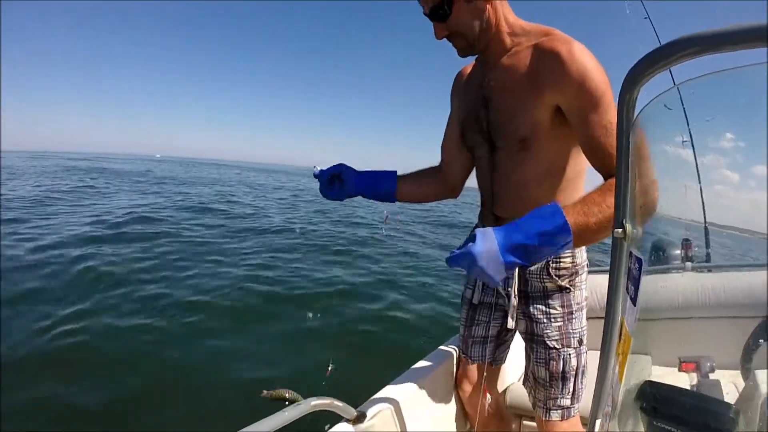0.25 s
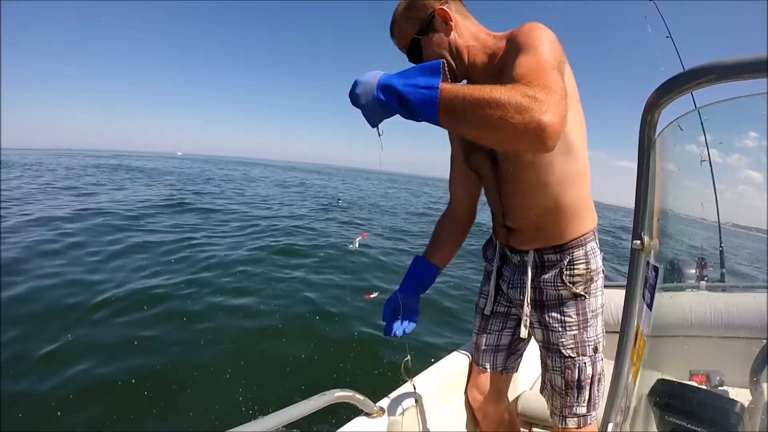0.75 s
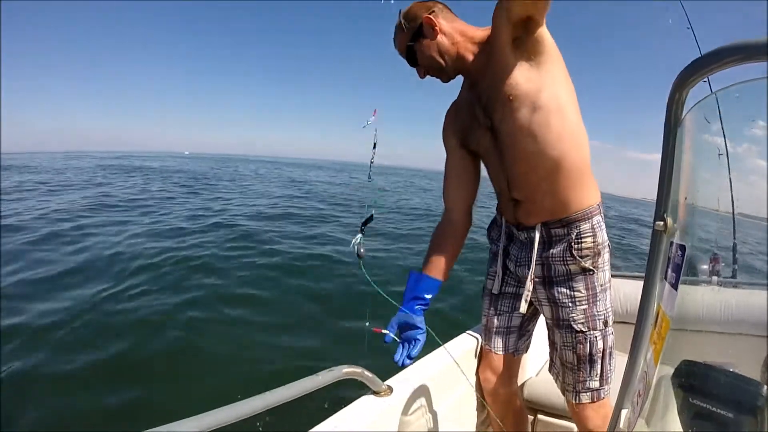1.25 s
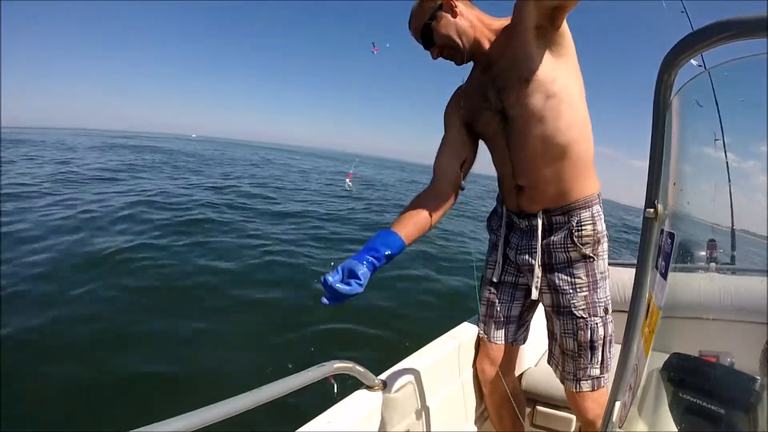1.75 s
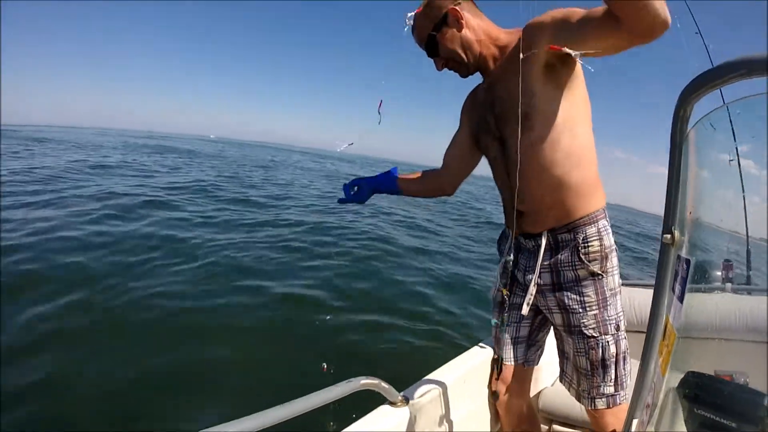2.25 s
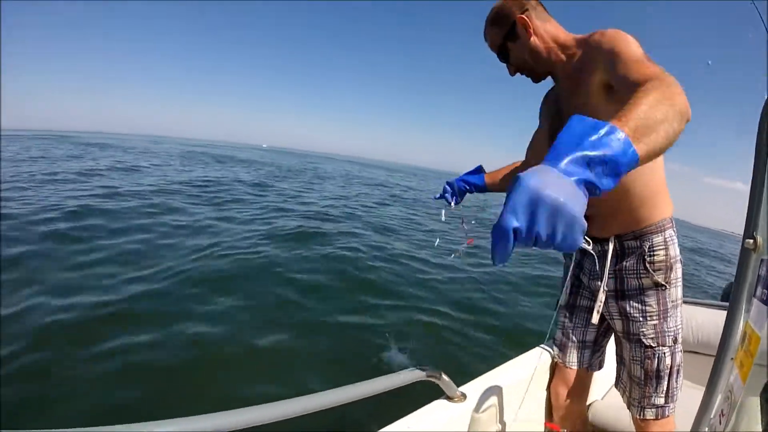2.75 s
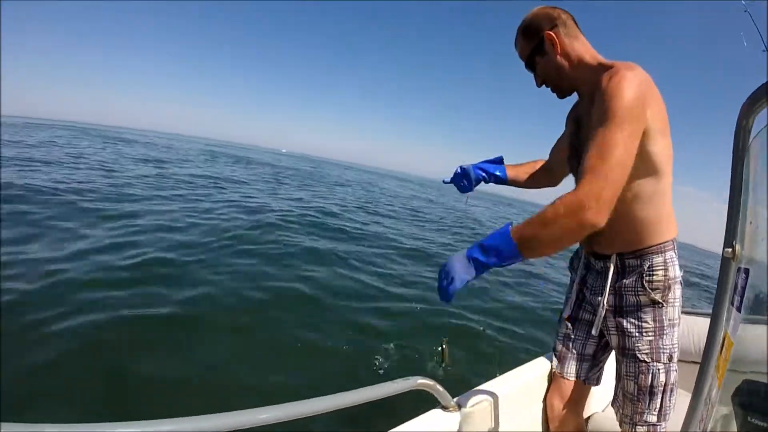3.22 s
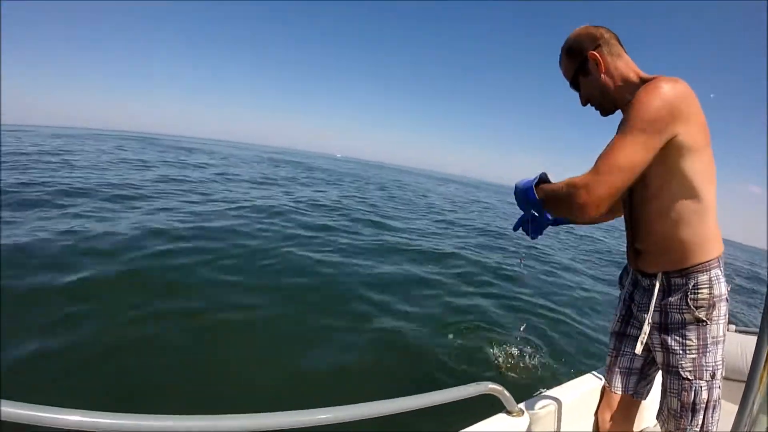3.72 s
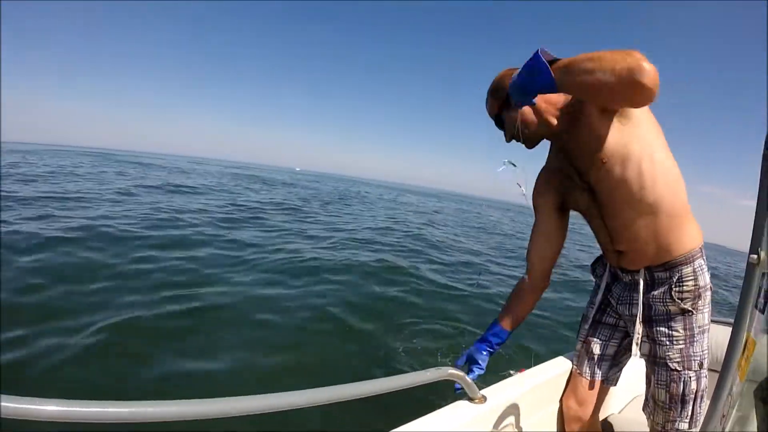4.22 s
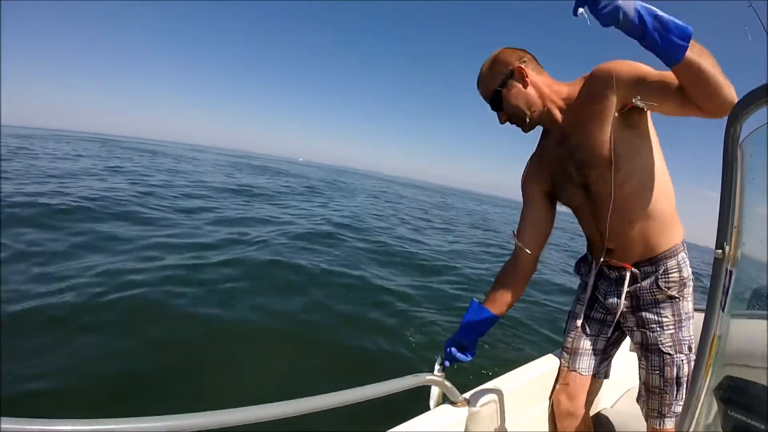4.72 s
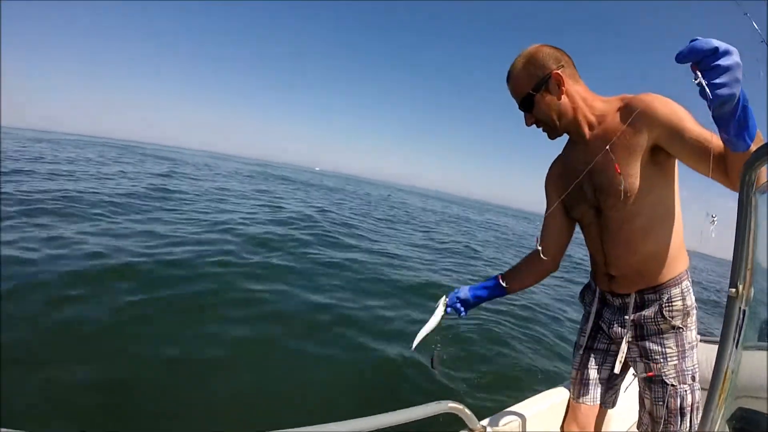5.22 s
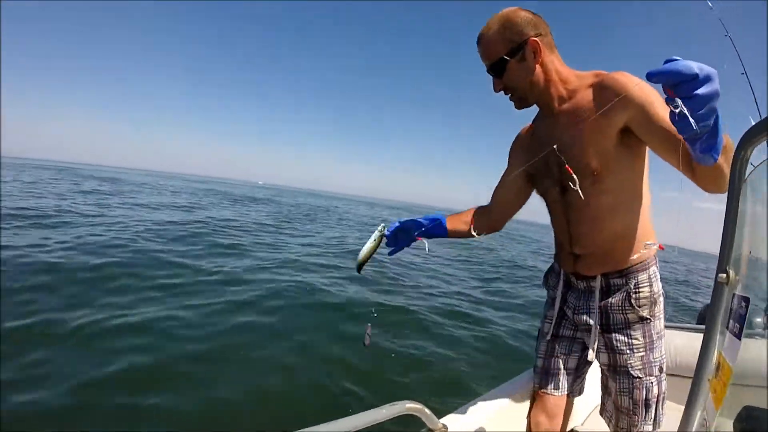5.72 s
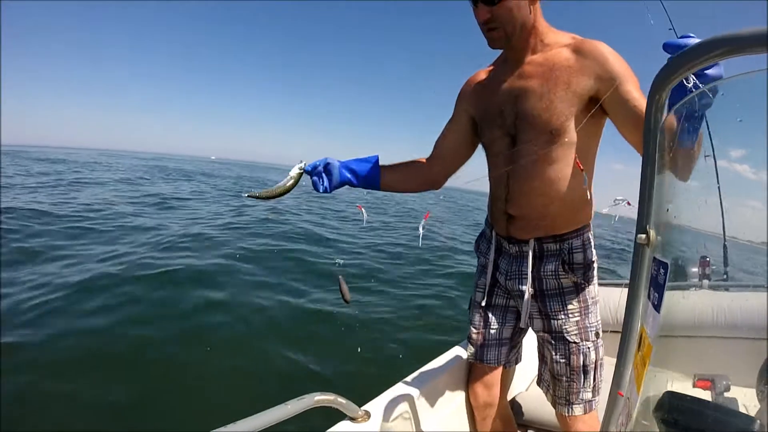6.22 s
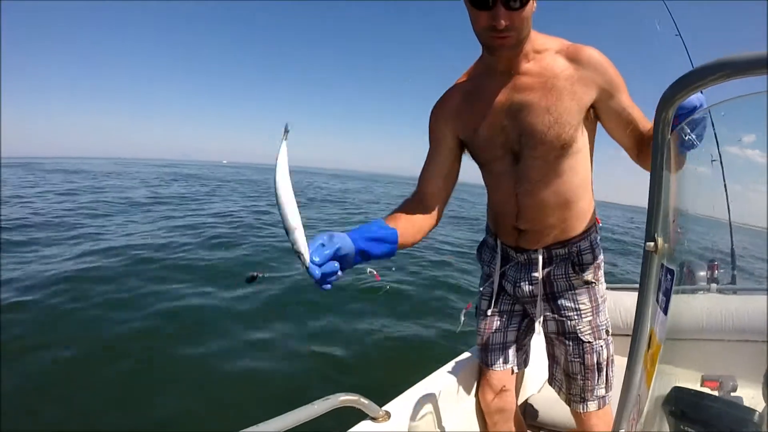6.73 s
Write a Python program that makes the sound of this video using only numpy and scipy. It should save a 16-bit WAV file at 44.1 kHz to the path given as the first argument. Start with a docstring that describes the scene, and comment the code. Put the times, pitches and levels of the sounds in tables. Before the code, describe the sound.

Close onboard microphone, outdoors with almost no echo. Fishing tackle ticks lightly and water dribbles off the catch; a single fibreglass knock rings briefly. A tiny squeak of wet line passes, then a quick run of bright hard knocks and ticks around three seconds. Afterwards it calms to soft sea noise, hull boom, small slaps and barely audible squeaks, until a low thump and loud brittle clicks hit the microphone housing.

```python
"""Tackle knocks on the fibreglass hull of a small drifting boat as a line of hooked fish is hauled in.
Each knock mixes short noise bursts with ringing tones; lighter ticks and dry clicks are built the same way.
Shaped noise and tiny bubble tones make water patter off the catch; gliding tones make wet line squeak in gloves.
A bird calls far off over the noise of light wind, calm sea and hollow hull.
At the end something bumps the microphone's housing and clicks sharply against it."""
import sys
import numpy as np
from scipy import signal
from scipy.fft import rfft, irfft, next_fast_len
from scipy.io import wavfile
from scipy.ndimage import map_coordinates

SR = 44100
rng = np.random.default_rng(int(sys.argv[2]) if len(sys.argv) > 2 else 0)


def output_pcm(signal):
    """Save a mono or channel-first signal as 16-bit PCM at the path in sys.argv[1].

    Samples are clipped to [-1, 1] before scaling.
    """
    pcm = np.clip(np.atleast_2d(signal).T, -1, 1) * 32767
    wavfile.write(sys.argv[1], SR, np.round(pcm).astype(np.int16))


N = 307377  # length of the scene [samples]
T = np.arange(SR // 3) / SR  # time within one event [s]

# colour of a hard crack on the hull: (frequency [Hz], level [dB])
CRACK = [(400, -46), (1000, -5.5), (1350, -5.5), (1650, 6.5), (2000, -0.5), (2400, -4), (2850, 6),
         (3250, -1), (4000, 3.5), (4600, -2), (5150, -19), (5950, 1.5), (7000, -15.5), (8200, -40)]
# colour of the fine treble sizzle of a contact: (frequency [Hz], level [dB])
SIZZLE = [(4120, -2), (7000, -4.5), (8760, -6.5), (10500, -1.5), (12200, -16), (14500, -27), (15500, -32),
          (16000, -48)]
# colour of falling drops and light ticks: (frequency [Hz], level [dB])
DROPS = [(600, -21), (1200, -10), (1600, -4.5), (2000, 1), (2500, -6.5), (3000, -3.5), (3600, 1.5),
         (4500, 1), (5150, -9.5), (5900, 2.5), (6500, -4), (7900, -20.5), (11000, -20.5), (15000, -37.5)]


def amp(db):
    """Turn decibels into a gain."""
    return 10 ** (np.asarray(db) / 20)


def unit(x):
    """Scale to an average strength (rms) of 1."""
    return x / np.sqrt(np.mean(x ** 2) + 1e-20)


def wobble(rate, size=N):
    """Draw a smooth random curve through `rate` random points a second."""
    points = rng.standard_normal(int(size * rate / SR) + 4)
    return map_coordinates(points, [np.arange(size) * rate / SR])


def coloured(x, spectrum):
    """Filter x through (frequency [Hz], level [dB]) points joined on a log frequency axis."""
    m = next_fast_len(len(x) + 8192)
    hz, db = np.transpose(spectrum)
    gain = amp(np.interp(np.log(np.fft.rfftfreq(m, 1 / SR) + 1), np.log(hz + 1), db))
    return irfft(rfft(x, m) * gain, m)[:len(x)]


def noise(spectrum, size=N):
    """Make coloured noise with an rms of 1."""
    return unit(coloured(rng.standard_normal(size), spectrum))


def tilted(spectrum, slope_db):
    """Brighten a colour, as a harder contact does, by slope_db per octave above its lowest point."""
    lowest_hz = spectrum[0][0]
    return [(hz, db + slope_db * np.log2(hz / lowest_hz)) for hz, db in spectrum]


def shifted(table, ratio):
    """Move modes or a colour to another pitch."""
    return [(hz * ratio, *rest) for hz, *rest in table]


def surges(rows):
    """Add up smooth bell-shaped rises of level [dB]."""
    t = np.arange(N) / SR
    return sum(db * np.exp(-((t - s) / half) ** 2) for s, half, db in rows)


def add(track, s, x):
    """Mix x into the track from s seconds on."""
    start = int(round(s * SR))
    part = track[start:start + len(x)]
    part += x[:len(part)]


def burst(spectrum, hold, t60, tail_db=-60, tail_t60=.15):
    """Noise stands for countless close modes: held while the contact chatters, then dying to a weak tail.

    hold, t60 and tail_t60 are in seconds; a t60 is the time to fall by 60 dB.
    """
    body = amp(-60 * np.maximum(T - hold, 0) / t60)
    tail = amp(tail_db - 60 * T / tail_t60)
    shape = (body + tail) * (1 - np.exp(-T / 0.0001))
    x = noise(spectrum, len(T)) * shape
    return x * np.linalg.norm(shape) / np.linalg.norm(x)


def ring(modes):
    """Sum the fading tones of a struck body, each at a slightly new strength every time."""
    out = np.zeros(len(T))
    for hz, db, t60 in modes:
        out += amp(db + rng.standard_normal() - 60 * T / t60) * np.sin(2 * np.pi * hz * T)
    return out


def chatter(x, spread, count=5):
    """Repeat x as a tumbling weight touches several times within `spread` seconds."""
    out = np.zeros(len(x))
    for delay in spread * (np.arange(count) + rng.random(count)) / count:
        add(out, delay, x * rng.choice([-1, 1]))
    return out * np.linalg.norm(x) / np.linalg.norm(out)


def knocks():
    """Each blow cracks on the hull's hard skin and rings the panels; heavy ones also thud in the hull."""
    # tackle striking the hull: (time [s], thud level [dB], panel ring level [dB], crack level [dB],
    # sizzle level [dB], brightness [dB per octave], hull pitch at the struck spot [ratio]);
    # the levels are relative: each part is trimmed further below
    blows = [(0.961, -33.5, -29, -23, -34.5, 2.5, 1.07), (3.1215, -31, -23, -21.5, -34, -6, 1),
             (3.189, -69, -32.5, -27.5, -32.5, 8, 1), (3.225, -32.5, -35, -32, -50, -2.5, 1.5),
             (3.3489, -54, -42, -38, -45.5, 2, 1.3)]
    # colour of the thud, before the pitch ratio: (frequency [Hz], level [dB])
    thud_colour = [(60, -38), (120, 1), (200, -2.5), (370, -0.5), (520, -6.5), (760, -3.5), (950, -22),
                   (1300, -7.5), (2500, -52)]
    # modes of the whole hull, before the pitch ratio: (frequency [Hz], level [dB], 60 dB fade time [s])
    hull_modes = [(150, -8, 0.14), (195, -3.5, 0.15), (295, -30, 0.054), (384, -2.5, 0.07),
                  (677, -16, 0.057), (803, -12, 0.073), (1170, -13, 0.035)]
    # modes of the hull's panels: (frequency [Hz], level [dB], 60 dB fade time [s])
    panel_modes = [(1467, -8.5, 0.055), (1567, -6.5, 0.097), (1670, 0.5, 0.037), (1845, -2, 0.04),
                   (2185, -4, 0.079), (2640, -21, 0.031), (2810, -5, 0.065), (3477, -12.5, .06),
                   (3830, -1, 0.03), (4550, -24, 0.043), (5840, -5, 0.027)]
    out = np.zeros(N)
    for s, thud_db, panel_db, crack_db, sizzle_db, bright_db, spot in blows:
        thud = amp(-2.5) * burst(shifted(thud_colour, spot), hold=0.0093, t60=0.12,
                                 tail_db=-22, tail_t60=0.65)
        thud = thud + amp(-0.5) * chatter(ring(shifted(hull_modes, spot)), spread=0.0122)
        panel = amp(-4.0) * chatter(ring(panel_modes), spread=.009)
        # the first touch is brighter; the body's answer lasts longer
        touch = amp(-3.5) * burst(tilted(CRACK, bright_db + 8), hold=0.001, t60=0.034)
        answer = amp(-6.5) * burst(tilted(CRACK, bright_db), hold=0.0082, t60=0.033,
                                   tail_db=-16.5, tail_t60=0.21)
        sizzle = burst(SIZZLE, hold=0.0018, t60=0.024, tail_db=-23, tail_t60=0.23)
        low = amp(thud_db) * thud + amp(panel_db) * panel
        high = amp(crack_db) * (touch + answer) + amp(sizzle_db) * sizzle
        add(out, s, low + high)
    return out


def ticks():
    """Small things touch too lightly to move the hull: a dry tick and a short ring."""
    # ticks of hooks, swivels and falling drops: (time [s], tick level [dB], sizzle level [dB]);
    # the levels are relative: both parts are trimmed below
    touches = [(0.0456, -45, -73), (0.4448, -43, -73), (0.4636, -38, -70), (0.5404, -30, -65),
               (0.5715, -38, -64), (0.7233, -41.5, -70), (0.866, -42.5, -72), (2.195, -39, -79),
               (2.202, -40, -78), (2.4562, -41, -69), (2.794, -44.5, -69), (3.0502, -36, -70),
               (3.2103, -31, -45), (3.3, -44, -50), (3.362, -30.5, -57), (3.6214, -31.5, -56),
               (3.7225, -44.5, -54.5), (3.774, -36, -75), (3.8234, -44.5, -60)]
    # modes of small steel tackle: (frequency [Hz], level [dB], 60 dB fade time [s])
    tackle_modes = [(1960, -10, 0.027), (3000, 3, 0.03), (3570, -1.5, 0.021), (4640, -6, 0.021),
                    (5740, -9, 0.03), (6550, -5, 0.024)]
    out = np.zeros(N)
    for s, db, sizzle_db in touches:
        tick = burst(DROPS, hold=0.00092, t60=0.026)
        tick = tick + amp(-8.5) * chatter(ring(tackle_modes), spread=0.0033, count=3)
        sizzle = burst(SIZZLE, hold=0.0015, t60=0.079)
        add(out, s, amp(db - 8.0) * tick + amp(sizzle_db - 1.5) * sizzle)
    return out


def close_clicks():
    """Contacts close to the microphone: a short dry ring whose pitch depends on the spot that is hit."""
    # sharp contacts: (time [s], relative level [dB], ring frequency [Hz], 60 dB fade time [s])
    contacts = [(0.5417, -39, 6150, 0.011), (3.3527, -28.5, 3880, .008), (6.9348, -36, 2320, 0.02),
                (6.9454, -9, 2840, 0.0049), (6.9545, -26, 2470, .01), (6.9595, -5, 4140, 0.0064),
                (6.9619, -14.5, 4000, 0.007)]
    # side resonances of the microphone's housing: (frequency [Hz], level [dB], 60 dB fade time [s])
    housing_modes = [(865, -24.5, 0.015), (2430, -22, 0.03), (2900, -40, .008), (3700, -11, 0.015),
                     (5790, -7, 0.01), (6130, -13.5, 0.006), (9600, -25, 0.0053)]
    out = np.zeros(N)
    for s, db, hz, t60 in contacts:
        main = amp(5.5 - 60 * T / t60) * np.sin(2 * np.pi * hz * T) * (1 - np.exp(-T / 0.00011))
        snap = amp(-20) * burst(CRACK, hold=0.00031, t60=0.0084, tail_db=-5, tail_t60=0.056)
        snap = snap + amp(-22.5) * burst(SIZZLE, hold=0.00045, t60=0.009)
        add(out, s, amp(db) * (main + amp(-1.5) * ring(housing_modes) + snap))
    return out


def bumps():
    """A soft push rocks the microphone: a low tone that sets in softly and fades fast."""
    # pushes: (time [s], relative level [dB], frequency [Hz])
    pushes = [(0.7244, -31.5, 48.3), (1.317, -31.5, 50.7), (3.333, -37, 65.5), (6.919, -26.5, 81),
              (6.931, -30.5, 135), (6.932, -22.5, 53.3)]
    out = np.zeros(N)
    for s, db, hz in pushes:
        fade = amp(db + 5 - 60 * T / 0.08)
        add(out, s, fade * np.sin(2 * np.pi * hz * T) * (1 - np.exp(-T / 0.0021)))
    return out


def squeaks():
    """Line sticks and slips on rubber: an unsteady gliding tone with overtones, scattered by the deck."""
    # slips of wet line through a glove: (start [s], length [s], relative level [dB], start pitch [Hz],
    # end pitch [Hz], octave level [dB], pitch jitter [share of the pitch])
    slips = [(1.5095, 0.0073, -42, 2930, 3170, -8, 0.066), (1.515, .006, -37, 3380, 3580, -22, 0.088),
             (1.519, 0.0045, -37.5, 4400, 4580, -23, 0.053), (4.376, 0.01, -49, 3100, 3360, -5.5, 0.094),
             (4.921, .009, -50, 3600, 3500, -20, 0.0091), (4.927, 0.021, -49, 3400, 3120, -2.5, .01),
             (5.019, 0.017, -44, 3020, 3005, -17.5, .008), (5.917, .009, -46.5, 2800, 2920, -18, .008)]
    out = np.zeros(N)
    for s, length, db, start_hz, end_hz, octave_db, jitter in slips:
        u = np.clip(T / length, 0, 1)  # progress through the slip
        glide = 1 - (1 - u) ** 2  # the pitch settles as the slip ends
        pitch = (start_hz + (end_hz - start_hz) * glide) * (1 + jitter * wobble(1500, len(T)))
        phase = 2 * np.pi * np.cumsum(pitch) / SR
        overtones = np.sin(2 * phase) + amp(-16) * np.sin(3 * phase)
        tone = np.sin(phase) + amp(octave_db) * overtones
        level = amp(db - 2.0 + 4.2 * wobble(380, len(T)))
        add(out, s, level * np.sqrt(abs(np.sin(np.pi * u))) * tone)
    deck = rng.standard_normal(len(T)) * amp(-60 * T / 0.098)  # fading noise acts as dense echoes
    return out + amp(-8) * signal.fftconvolve(out, deck / np.linalg.norm(deck))[:N]


def showers():
    """Gain of the dripping water: each shower rises, holds and drips away over a steady trickle."""
    # water shaken off the line and fish: (time of full level [s], hold length [s], level [dB])
    falls = [(0.46, 0.14, -57.5), (0.75, 0.16, -60), (2.46, 0.027, -66), (2.843, 0.028, -55),
             (3.009, .06, -54), (3.234, 0.063, -55.5), (3.733, 0.026, -59.5), (4.058, .08, -65.5),
             (6.77, .02, -65), (6.916, .05, -57)]
    attack_s, fade_t60, trickle_db = 0.033, 0.83, -70.5  # rise [s], 60 dB fade [s], steady drip [dB]
    t = np.arange(N) / SR
    power = np.full(N, amp(trickle_db) ** 2)
    for s, length, db in falls:
        attack = np.clip(1 + (t - s) / attack_s, 0, 1)
        fade_db = -60 * np.maximum(t - s - length, 0) / fade_t60
        power += (attack * amp(db + fade_db)) ** 2
    return np.sqrt(power)


def water():
    """Droplets patter and plink on the sea over a fine spray; wavelets slap the side."""
    # wavelets slapping the side: (time [s], level [dB])
    laps = [(0.5703, -50.5), (0.895, -60), (2.794, -54), (3.048, -53), (3.33, -52.5), (4.1, -61.5),
            (5.624, -55), (5.665, -53), (5.745, -53.5)]
    drops_per_s, spread_db, drop_t60, spray_share = 320, 5, 0.027, 0.7  # drop_t60: 60 dB fade [s]
    strengths = amp(spread_db * np.minimum(rng.exponential(size=N), 3))
    drops = (rng.random(N) < drops_per_s / SR) * strengths
    splats = signal.fftconvolve(drops, amp(-60 * T / drop_t60))[:N]
    patter = unit(coloured(rng.standard_normal(N) * (splats + spray_share), DROPS))

    plinks = np.zeros(N)
    t = T[:SR // 50]
    for when, pitch, strength in rng.random((4000, 3)):
        hz = 1700 * 4 ** pitch  # each drop traps a tiny bubble that rings for some cycles
        bubble = np.sin(2 * np.pi * hz * t) * np.exp(-hz * t / 9)
        add(plinks, when * N / SR, amp(10 * strength) * bubble)
    out = showers() * (amp(-1.5) * patter + amp(-6.5) * unit(coloured(plinks, DROPS)))

    slap_colour = [(500, -15), (1100, 2), (1700, 3.5), (2400, -3), (4000, -6), (8000, -23), (15000, -48)]
    for s, db in laps:
        add(out, s, amp(db) * burst(slap_colour, hold=0.0073, t60=0.11))
    return out


def far_bird():
    """One thin falling call, made of a second harmonic and a third that fades away during the call."""
    # the call: (start [s], length [s], level [dB], start and end pitch of the unheard fundamental [Hz])
    cries = [(6.303, 0.2, -66.5, 1620, 1340)]
    out = np.zeros(N)
    for s, length, db, start_hz, end_hz in cries:
        u = np.clip(T / length, 0, 1)  # progress through the call
        glide = end_hz + (start_hz - end_hz) * (1 - u) ** 2
        pitch = glide * (1 + 0.013 * wobble(295, len(T)))
        phase = 2 * np.pi * np.cumsum(pitch) / SR
        tone = np.sin(2 * phase) + amp(-30 * u) * np.sin(3 * phase)
        add(out, s, amp(db) * np.sqrt(abs(np.sin(np.pi * u))) * tone)
    return out


def sea_air():
    """Light wind rumbles on the microphone over the sea's wash, the hull's boom and a thin steady hiss."""
    # gusts of wind: (middle [s], half length [s], rise [dB])
    gusts = [(3.1, 0.28, 1.5), (4.8, 0.2, 4), (6.15, 0.26, 3.5)]
    # swells passing under the hull: (middle [s], half length [s], rise [dB])
    swells = [(2.3, 0.15, 2), (5.65, 0.12, 8.5), (6.13, .08, 5), (6.85, 0.14, 7)]
    # colour of the wind's rumble: (frequency [Hz], level [dB])
    rumble_colour = [(11, -30), (18, 2.5), (38, -3), (87, -8), (130, -15.5), (170, -70), (290, -120)]
    # colour of the open sea all around: (frequency [Hz], level [dB])
    sea_colour = [(65, -8), (110, -5.5), (130, -2), (165, -2), (189, -4.5), (239, -6), (279, -7.5),
                  (405, -9.5), (571, -12), (607, -13), (1540, -19), (1830, -20.5), (2010, -21.5),
                  (3300, -24.5), (4500, -38.5), (5850, -50), (9900, -120)]
    # colour of the hiss: (frequency [Hz], level [dB])
    hiss_colour = [(2350, -30), (4000, 0.5), (5410, 1), (5930, -0.5), (6700, -4), (7440, -4), (8020, -6),
                   (11800, -13.5), (13800, -15), (15100, -51), (15400, -28.5), (15600, -37), (16000, -43)]
    boom_colour = [(100, -35), (145, -12), (165, 5.5), (190, -6.0), (260, -47.5)]
    flutter_db = 1 * wobble(9)
    wind = amp(-54.5 + surges(gusts) + flutter_db) * noise(rumble_colour)
    wash = amp(-55 + 0.9 * wobble(7)) * noise(sea_colour)
    boom = amp(-63.5 + surges(swells)) * noise(boom_colour)  # the hollow hull rides the water
    hiss = amp(-70) * noise(hiss_colour)
    return wind + wash + boom + hiss


def scene():
    """Everything reaches one microphone."""
    contacts = knocks() + ticks() + close_clicks() + bumps()
    return (contacts + squeaks() + water() + far_bird() + sea_air())[None]


def record(dry):
    """The microphone keeps almost nothing above its band limit: a very steep treble cut."""
    top_hz = 15400
    m = next_fast_len(N + 8192)
    gain = 1 / (1 + (np.fft.rfftfreq(m, 1 / SR) / top_hz) ** 80)
    return irfft(rfft(dry, m) * gain, m)[:, :N]


dry = scene()
out = record(dry)
output_pcm(out)
```